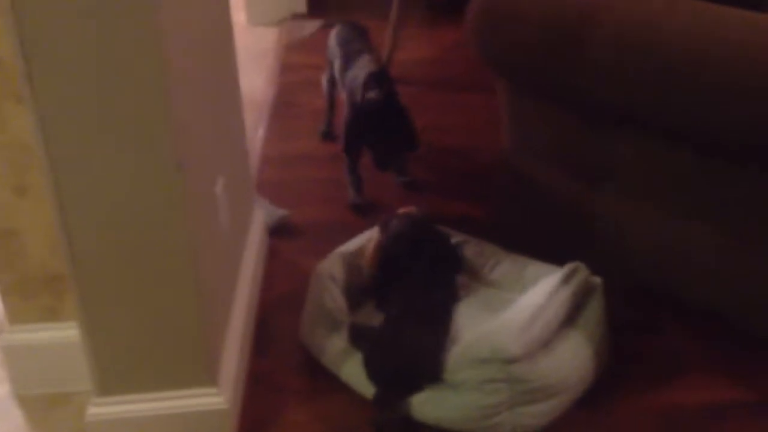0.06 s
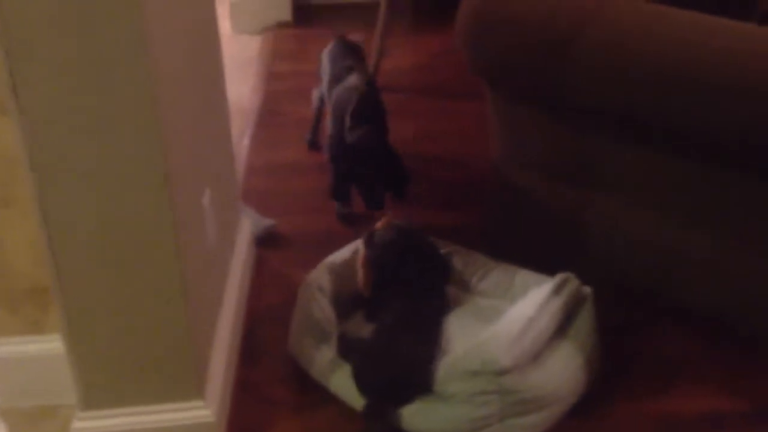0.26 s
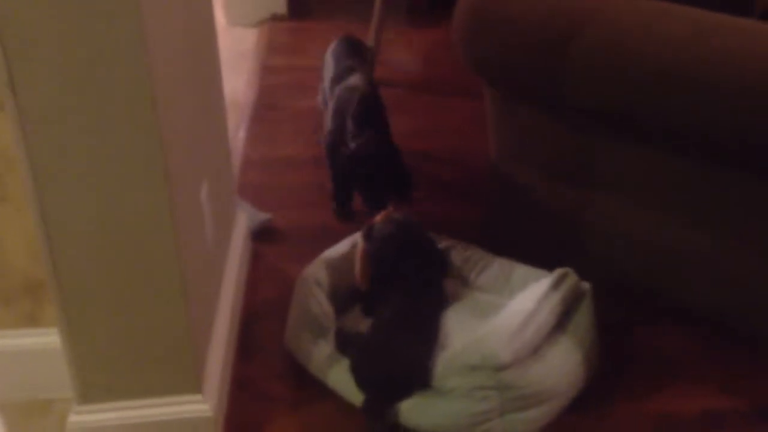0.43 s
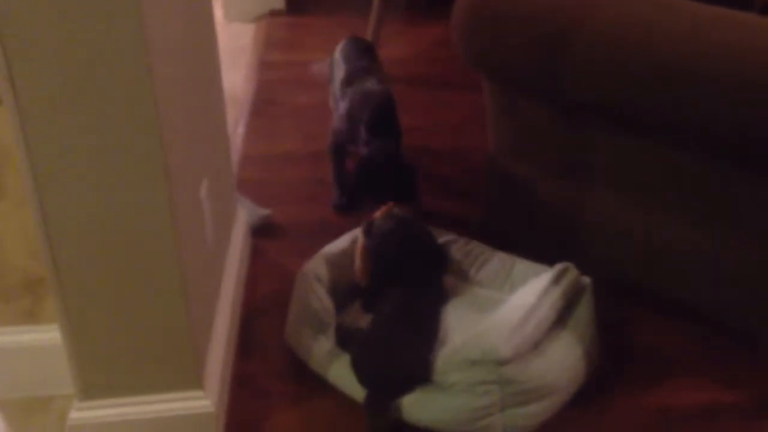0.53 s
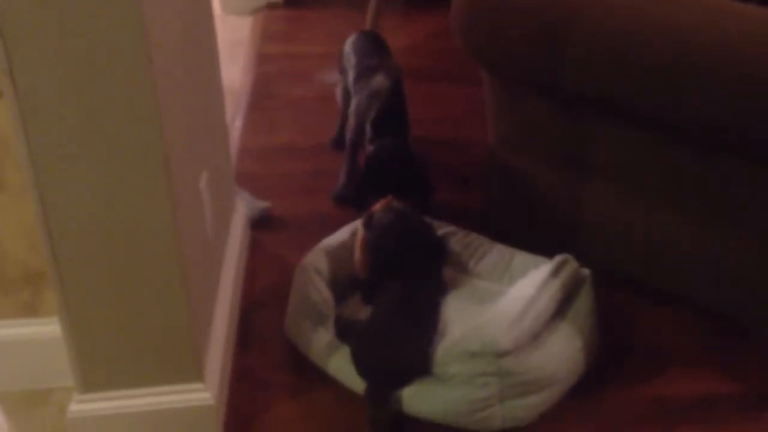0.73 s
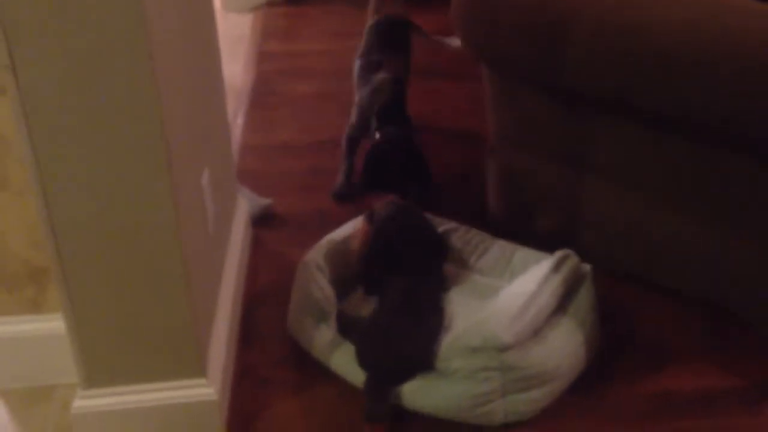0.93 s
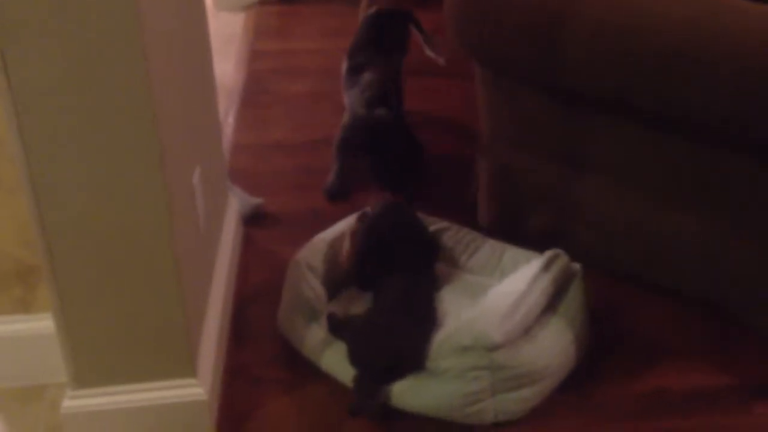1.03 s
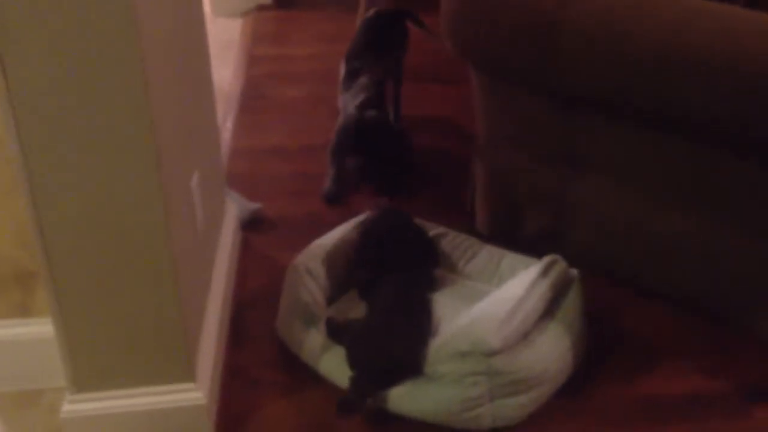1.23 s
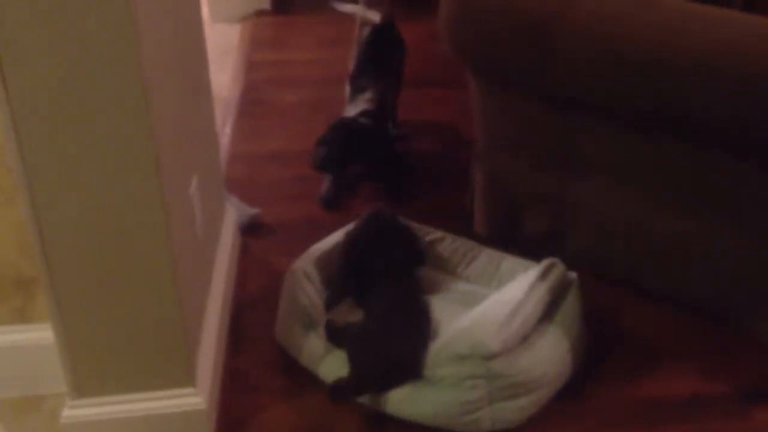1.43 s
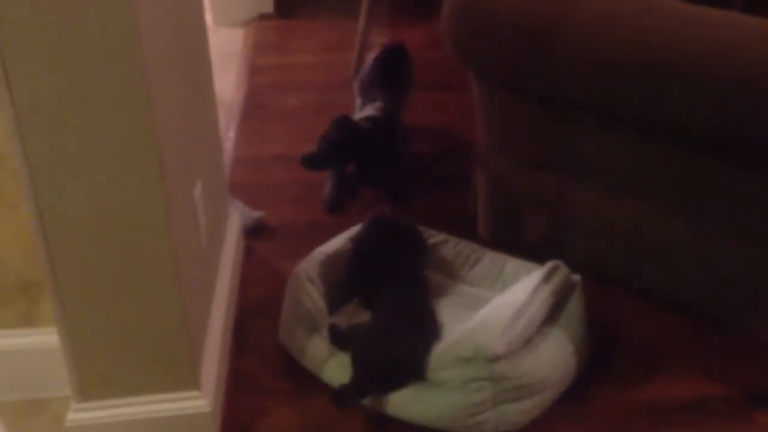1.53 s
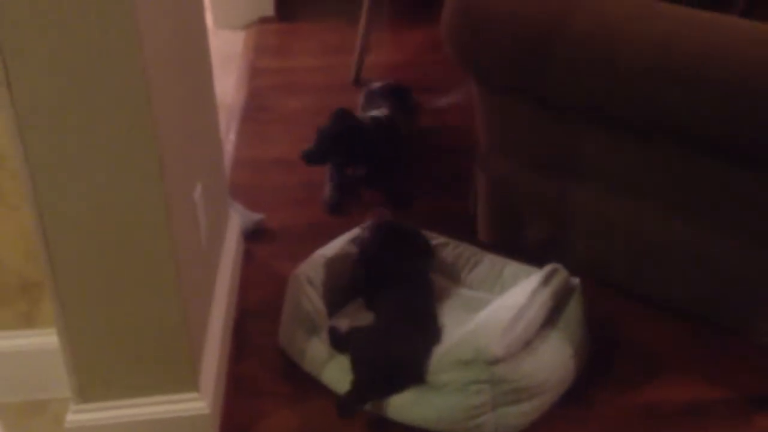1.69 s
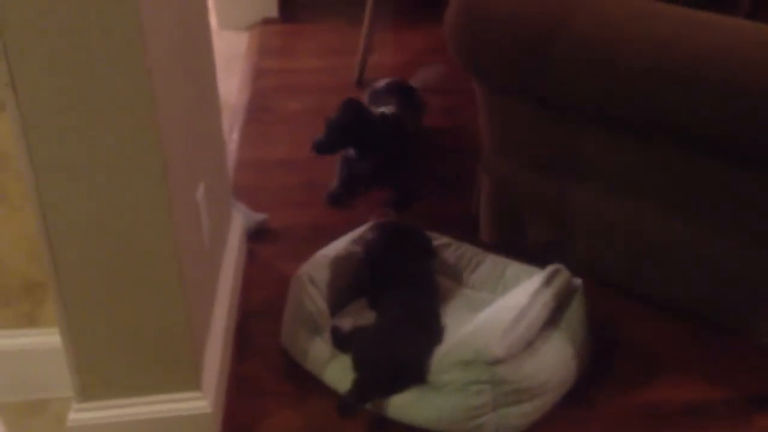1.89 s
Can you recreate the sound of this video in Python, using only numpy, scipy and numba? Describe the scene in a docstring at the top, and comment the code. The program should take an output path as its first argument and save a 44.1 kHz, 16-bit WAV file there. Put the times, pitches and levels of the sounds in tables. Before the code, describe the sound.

One long, low, rough dog growl starts after a floor knock, flutters, steadies and sinks in pitch, while collar tags clink and paws scuff on a wooden floor; quiet living room, single microphone with soft hiss.

```python
"""Young dog growling on a tug toy, quiet living room

One long, low growl through clamped teeth starts as a flutter, steadies, then sinks in pitch: uneven fold
pulses and rasp ring chest, throat, lips and teeth around clean low harmonics. Collar tags clink as decaying
metal modes; paws knock, click and scuff on the wooden floor as coloured bursts, impulses and noise swells.
Room noise, hiss and faint wandering tones lie underneath, with tiny treble crackles early on; one microphone."""
import sys
import numpy as np
from scipy import signal
from scipy.fft import rfft, irfft
from scipy.io import wavfile
from scipy.ndimage import uniform_filter1d
from numba import njit

SR = 44100
rng = np.random.default_rng(int(sys.argv[2]) if len(sys.argv) > 2 else 0)


def generate_wav(signal):
    """Clip the signal to [-1, 1] and save it as 16-bit WAV at the path in sys.argv[1]."""
    frames = np.transpose(np.atleast_2d(signal))
    scaled = np.clip(frames, -1, 1) * 32767
    pcm = np.round(scaled).astype(np.int16)
    wavfile.write(sys.argv[1], SR, pcm)


N = 85995

# Rough part of the growl, before trims and catches:
# t/s, chest level/dB, throat level/dB, lips level/dB, level of the snarl through bared teeth/dB
EFFORT = [(.42, -86, -64, -96, -91), (.45, -56, -66, -72, -87), (.49, -56.5, -60.5, -64, -72),
          (.56, -46.5, -65, -67.5, -76), (.62, -51.5, -59.5, -67, -69), (.71, -53.5, -65, -64.5, -73),
          (.76, -56.5, -58, -59.5, -62), (.84, -58.5, -58, -64, -63), (.915, -48.5, -59, -62.5, -70),
          (.96, -50, -59, -69, -79), (1.07, -49.5, -57.5, -62.5, -99), (1.13, -50.5, -58, -62, -73),
          (1.27, -56, -59.5, -61, -71), (1.41, -53.5, -61, -64.5, -61.5), (1.5, -59, -63, -67, -68.5),
          (1.61, -58.5, -66.5, -67, -87), (1.66, -58, -73.5, -92, -70.5), (1.72, -93, -64, -87, -70)]
# Grainy swells, the first a faint rasp of the growl, the others paws scuffing:
# middle t/s, length/s, level before the room/dB
GRAINY_SWELLS = [(0.837, 0.22, -75), (1.325, 0.089, -63.5), (1.42, 0.055, -66), (1.456, 0.012, -60),
                 (1.56, 0.041, -57.5), (1.625, 0.043, -65.5), (1.668, 0.027, -65.5)]
# Colour of the grainy swells: f/Hz, relative level/dB
GRAINY_COLOUR = [(100, -36), (1000, -4), (2700, -8.5), (3400, 3), (4700, -1), (5400, -12), (8000, -8.5),
                 (12000, -19), (15000, -14.5)]
CONTACT_ROOM_DB = -11  # room tail of claws and grainy swells


def undb(db):
    """Decibels to gain."""
    return 10 ** (np.asarray(db) / 20)


def unit(x):
    """Scale to rms 1."""
    return x / np.sqrt(np.mean(x ** 2) + 1e-30)


def clock():
    """Time of every sample in seconds."""
    return np.arange(N) / SR


def curve(table, axis):
    """One column of a table, joined by straight lines in time."""
    rows = np.array(table)
    return np.interp(clock(), rows[:, 0], rows[:, axis])


def walk(hz):
    """Smoothed random steps, hz per second, at rms 1."""
    k = int(SR / hz)
    steps = np.repeat(rng.standard_normal(N // k + 1), k)
    smooth = uniform_filter1d(uniform_filter1d(steps, k), k)
    return unit(smooth[:N])


def bumps(rows):
    """Brief rises or dips in dB at (t/s, half length/s, level/dB)."""
    return sum(db * np.exp(-((clock() - start) / length) ** 2) for start, length, db in rows)


def fade(start, t60):
    """Sudden start and exponential decay by 60 dB in t60 seconds."""
    age = clock() - start
    return (age >= 0) * undb(-60 * np.maximum(age, 0) / t60)


def colour(x, points):
    """Causal filter through (f/Hz, level/dB) points that keeps the power of white noise."""
    hz, db = np.array(points).T
    grid_hz = np.arange(N + 1) * SR / (2 * N)
    log_gain = np.interp(np.log(grid_hz + 1), np.log(hz), np.log(undb(db)))
    # Folding the cepstrum onto positive time makes the filter minimum phase
    cepstrum = irfft(log_gain)
    cepstrum[1:N] *= 2
    cepstrum[N + 1:] = 0
    filtered = irfft(rfft(x, 2 * N) * np.exp(rfft(cepstrum)))[:N]
    return filtered / np.sqrt(np.mean(np.exp(2 * log_gain)))


def resonate(x, table):
    """Resonances side by side, each filter run twice for steep skirts, with their sum at rms 1."""
    out = 0
    for hz, width, db in table:
        b, a = signal.iirpeak(hz, hz / width, fs=SR)
        once = signal.lfilter(b, a, x)
        out = out + undb(db) * unit(signal.lfilter(b, a, once))
    return unit(out)


def room(x, db):
    """Direct sound plus a short diffuse tail, its energy set in dB."""
    tail = colour(rng.standard_normal(N), [(200, -5), (2000, -5.0), (12000, -11.5)])
    tail = tail * fade(0.00262, t60=0.4)
    tail = tail / np.sqrt(np.sum(tail ** 2))
    return x + undb(db) * signal.fftconvolve(x, tail)[:N]


def taps(rows, points):
    """Single sharp contacts at (t/s, peak level/dB), coloured by what is struck."""
    ring = colour(signal.unit_impulse(N), points)
    times, db = np.array(rows).T
    pushes = np.bincount((times * SR).astype(int), undb(db), N)[:N]
    return signal.fftconvolve(pushes, ring / np.abs(ring).max())[:N]


def blows(rows, points, t60):
    """Short decaying noise bursts at (t/s, level/dB), coloured by what is struck."""
    envelope = sum(undb(db) * fade(start, t60) for start, db in rows)
    return colour(rng.standard_normal(N) * envelope, points)


def rubs(rows, points):
    """Grainy noise swells centred at (t/s, length/s, level/dB)."""
    swell = sum(undb(db) * np.exp(-(2 * (clock() - middle) / length) ** 2) for middle, length, db in rows)
    grain = unit(rng.standard_normal(N) * undb(2 * walk(700)))
    return colour(grain * swell, points)


def background():
    """Low room noise and hiss from shaped noise, with faint steady tones from sines that wander in level."""
    # Spectrum of room noise and hiss: f/Hz, relative level/dB
    air_colour = [(30, -33.5), (70, -26), (100, -27.5), (125, -12), (200, -6.5), (280, -1), (350, -6.5),
                  (450, -7), (600, -13.5), (800, -15), (1000, -16.5), (1400, -19), (2000, -22),
                  (3000, -27.5), (4200, -23), (5500, -29), (8000, -25.5), (10000, -33.5), (13000, -28),
                  (15000, -30.5)]
    # Faint steady tones, middle of the wander: f/Hz, level/dB
    tone_lines = [(120, -80.5), (184, -73.5), (1120, -83)]
    tones = 0
    for hz, db in tone_lines:
        tones = tones + np.sqrt(2) * undb(db + 2.2 * walk(4)) * np.sin(2 * np.pi * hz * clock())
    air_rms_db = -62.05
    return undb(air_rms_db) * unit(colour(rng.standard_normal(N), air_colour)) + tones


def crackle():
    """Tiny, unevenly spaced clicks high in the treble: coloured impulses of varying level."""
    # Short runs of crackle: start t/s, end t/s
    runs = [(.040, .046), (.061, .067), (.170, .236), (.251, .261)]
    # Colour of one click: f/Hz, relative level/dB
    click_colour = [(2000, -33), (7000, -23), (8200, 4.5), (9200, 3), (10500, -2), (13000, -4),
                    (15000, -6.5)]
    rate_hz, peak_db, timing_spread_s, level_spread_db = 189.6, -49, .001, 1.5
    times = np.concatenate([np.arange(start, end, 1 / rate_hz) for start, end in runs])
    chance = rng.standard_normal((len(times), 2))
    uneven_times = times + timing_spread_s * chance[:, 0]
    levels_db = peak_db + level_spread_db * chance[:, 1]
    return taps(np.c_[uneven_times, levels_db], click_colour)


def board_ring(start, force_db):
    """The struck floorboards ring as decaying sines, heard just after the blow."""
    # Modes of the boards: f/Hz, level against the blow/dB, t60/s
    board_modes = [(305, -18, 0.26), (1088, -23, 0.14), (1570, -19.5, 0.12), (2035, -22, .17)]
    ring = 0
    for hz, db, t60 in board_modes:
        tone = np.sin(2 * np.pi * hz * (clock() - start))
        ring = ring + undb(force_db + db) * fade(start + 0.0022, t60) * tone
    return ring


def paws():
    """Knocks are coloured impulses, thuds and claw clicks decaying noise, scuffs grainy noise on the boards."""
    # Knock on the floor, a blow and its bounce: t/s, peak level before the room/dB
    knock_rows = [(.2064, -42), (.2144, -45)]
    # Colour of the knock: f/Hz, relative level/dB
    knock_colour = [(30, -41), (100, -4), (400, 0), (750, 8), (1300, 5.5), (2000, 6), (2900, -14),
                    (5000, -37), (15000, -33)]
    # Dull thumps as the knock settles: t/s, peak level before the room/dB
    thump_rows = [(.2112, -52), (.2203, -59), (.23, -53), (.239, -56)]
    # Colour of the thumps: f/Hz, relative level/dB
    thump_colour = [(90, -42), (200, -14), (330, 0), (800, -20), (3000, -55)]
    # Paws landing: t/s, starting level/dB
    step_rows = [(.857, -55.5), (1.375, -54.5), (1.607, -62)]
    # Colour of the landing thuds: f/Hz, relative level/dB
    thud_colour = [(25, 2), (70, 2), (170, 12), (260, -24), (900, -36)]
    # Claw clicks: t/s, starting level before the room/dB
    claw_rows = [(1.609, -42.5), (1.618, -50.5), (1.771, -69)]
    # Colour of the claws: f/Hz, relative level/dB
    claw_colour = [(100, -28), (500, 1), (2000, 3.5), (2800, -4), (4200, 6), (5500, -4.5), (8000, -1),
                   (12000, -19), (15000, -29)]
    knock_room_db = -7.5
    contacts = taps(knock_rows, knock_colour) + taps(thump_rows, thump_colour)
    knocks = room(contacts, knock_room_db) + board_ring(*knock_rows[0])
    thuds = blows(step_rows, thud_colour, t60=0.025)
    clicks = blows(claw_rows, claw_colour, t60=0.0075)
    scuffs = rubs(GRAINY_SWELLS[1:], GRAINY_COLOUR)
    return knocks + thuds + room(clicks + scuffs, CONTACT_ROOM_DB)


def flap(x, table):
    """Loose tissue rings unevenly, but its swing is limited."""
    swing = signal.hilbert(resonate(x, table))
    swing_limit = .45  # against a ring at rms 1
    return unit(swing.real / np.hypot(np.abs(swing), swing_limit))


@njit
def sweep(x, hz, width):
    """State-variable band-pass whose centre moves."""
    out, band, low = np.empty(len(x)), 0., 0.
    for i in range(len(x)):
        g, k = np.tan(np.pi * hz[i] / SR), width / hz[i]
        v = (band + g * (x[i] - low)) / (1 + g * (g + k))
        band, low, out[i] = 2 * v - band, low + 2 * g * v, k * v
    return out


def sweep_twice(x, hz, width):
    """One steep, moving resonance at rms 1."""
    once = sweep(x, hz, float(width))
    return unit(sweep(once, hz, float(width)))


def fold_pulses(cycles):
    """One pulse per fold cycle, uneven in time and strength, as folds that close irregularly."""
    jitter_cycles, shimmer_db = 0.032, 3
    beat = np.arange(1, int(cycles[-1]))
    chance = rng.standard_normal((len(beat), 2))
    at = np.interp(beat + jitter_cycles * chance[:, 0], cycles, np.arange(N)).astype(int)
    return np.bincount(at, undb(shimmer_db * np.clip(chance[:, 1], -2, 2)), N)


def mouth(drive, grit, cycles):
    """Rough pulses and a clear buzz ring the moving throat and lips; grit rasps through the teeth."""
    # Fixed throat resonances: f/Hz, width of each pass/Hz, relative level/dB
    throat_rings = [(360, 90, -4), (482.5, 46, -1), (627.7, 68, 0), (703.3, 43, -3.5), (865, 130, -4.5)]
    # Resonances of the snarl at the teeth: f/Hz, width of each pass/Hz, relative level/dB
    teeth_rings = [(1517, 790, 6.5), (2226, 160, -3), (3450, 1700, -3.5)]
    # Resonances that move as the grip shifts: t/s, throat f/Hz, lips f/Hz
    mouth_shape = [(.5, 675, 1090), (.7, 670, 1190), (.82, 655, 1175), (.9, 630, 1250), (1.02, 660, 1119),
                   (1.14, 624, 1174), (1.3, 620, 1270), (1.42, 644, 1190), (1.65, 600, 1190)]
    # Gritty rasp between the teeth, before surges and room: t/s, level/dB
    grit_level = [(.45, -82), (.59, -70), (.66, -74), (.74, -74), (.99, -80), (1.07, -70), (1.22, -79.5),
                  (1.38, -72.5), (1.5, -96)]
    # Resonances of the grit: f/Hz, width of each pass/Hz, relative level/dB
    grit_rings = [(2240, 200, -1.5), (3500, 740, 4), (4510, 290, 0.5)]
    throat_width_hz, lips_width_hz = 180, 337  # each of two passes
    buzz_db, throat_buzz_db, buzz_flicker_db = -5.5, -.5, 2
    snarl_at_s, snarl_half_length_s, snarl_ratio = 1.3, .11, 1.25  # ratio to the lip resonance

    throat_hz, lip_hz = curve(mouth_shape, axis=1), curve(mouth_shape, axis=2)
    throat, lips, teeth = [undb(curve(EFFORT, axis)) for axis in (2, 3, 4)]
    rough = resonate(drive, throat_rings) * throat
    rough = rough + sweep_twice(drive, lip_hz, lips_width_hz) * lips
    rough = rough + resonate(drive, teeth_rings) * teeth

    buzz = unit(sum(np.cos(2 * np.pi * k * cycles) for k in range(3, 15)))  # harmonics 3 to 14
    clear = sweep_twice(buzz, throat_hz, throat_width_hz) * throat * undb(throat_buzz_db)
    clear = clear + sweep_twice(buzz, lip_hz, lips_width_hz) * lips
    # The teeth are bared once near the end and ring above the lips
    bared = np.exp(-((clock() - snarl_at_s) / snarl_half_length_s) ** 2)
    clear = clear + sweep_twice(buzz, snarl_ratio * lip_hz, lips_width_hz) * lips * bared
    rasp = resonate(grit, grit_rings) * undb(curve(grit_level, axis=1))
    return rough, undb(buzz_db + buzz_flicker_db * walk(90)) * clear + rasp


def growl():
    """Uneven fold pulses and gated rasp ring chest and mouth, around clean low harmonics that stumble and split."""
    # Vocal folds: t/s, pitch f/Hz, level of the clean second harmonic before tremor and catches/dB
    folds = [(.44, 108.2, -54), (.49, 110.9, -58.5), (.55, 111.6, -52), (.64, 111.9, -56),
             (.70, 110.3, -52), (.78, 113.9, -46), (.86, 119, -53), (.94, 123.7, -50.5), (1.05, 125.7, -48),
             (1.12, 120.1, -63.5), (1.2, 124.3, -47), (1.31, 118.6, -50.5), (1.38, 105.8, -43),
             (1.45, 102, -49.5), (1.48, 98.83, -62), (1.515, 100.4, -46), (1.55, 96, -55.5),
             (1.605, 95.5, -51), (1.68, 85.6, -65)]
    # Catches where the voice dips for an instant: t/s, half length/s, depth/dB
    catch_rows = [(.426, .015, -26), (.469, .007, -18), (.502, .004, -10), (.531, .006, -11),
                  (.572, .004, -10), (.637, .004, -9), (.679, .005, -5), (.911, .005, -8),
                  (.989, .005, -11), (1.127, .004, -9), (1.291, .004, -5), (1.36, .007, -10),
                  (1.397, .006, -14), (1.468, .005, -8), (1.497, .004, -8), (1.552, .008, -5),
                  (1.6, .003, -8)]
    # Hoarse surges in the mouth: t/s, rise/dB
    surge_rows = [(.832, 5), (.878, 4), (.914, 8), (1.035, 5), (1.137, 5), (1.257, 6), (1.366, 6)]
    # A second strand splits off as the growl sinks: t/s, f/Hz, level before catches/dB
    strand_path = [(1.3, 262, -93), (1.36, 254.3, -52), (1.45, 231.3, -49), (1.54, 242.4, -73.5),
                   (1.575, 284, -55.5), (1.62, 237, -52.5), (1.68, 200.8, -87)]
    # Chest resonances: f/Hz, width of each pass/Hz, relative level/dB
    chest_rings = [(162.7, 31, -3), (195.5, 31, -3.5), (228, 58.7, 0), (290.3, 9.7, -20.5)]
    # Deep chest resonances: f/Hz, width of each pass/Hz, relative level/dB
    deep_chest_rings = [(123.6, 9.2, 7.7), (142.5, 28, 0.29)]
    waver, tremor_db, fundamental_db = .016, 1, -12.5  # waver: share of pitch; fundamental: against second
    stumble_from_s, stumble_per_db = 1.33, .012  # share of pitch lost per dB of catch
    rasp_share, chest_pulse_share = 0.38, 0.29
    deep_db, deep_from_hz, deep_loss_db_per_hz = -2.5, 118.6, 0.5
    surge_half_length_s, mouth_catch_share = .0065, .35
    rough_db, rough_room_db, edge_room_db, low_cut_hz = -6, 1, -3.5, 114

    t = clock()
    pitch, catches = curve(folds, axis=1), bumps(catch_rows)
    stumble = stumble_per_db * catches * (t > stumble_from_s)
    cycles = np.cumsum(pitch * (1 + waver * walk(45) + stumble)) / SR
    pulses = fold_pulses(cycles)
    # Each pulse lets out a decaying puff of noise
    puffs = unit(signal.fftconvolve(pulses, fade(0, t60=0.012))[:N] * rng.standard_normal(N))
    drive = unit(pulses) + rasp_share * puffs
    heave = chest_pulse_share * unit(pulses) + puffs

    # The deep chest weakens as the pitch sinks
    deep = undb(deep_db - deep_loss_db_per_hz * np.maximum(deep_from_hz - pitch, 0))
    rumble = flap(heave, chest_rings) + deep * flap(heave, deep_chest_rings)
    rumble = rumble * undb(curve(EFFORT, axis=1))

    clean = np.sin(4 * np.pi * cycles) + undb(fundamental_db) * np.sin(2 * np.pi * cycles)
    clean = clean * undb(curve(folds, axis=2) + tremor_db * walk(70))
    strand_cycles = np.cumsum(curve(strand_path, axis=1)) / SR
    strand = np.sin(2 * np.pi * strand_cycles) * undb(curve(strand_path, axis=2))

    gate = np.interp(t, [.41, .44, 1.68, 1.76], [0, 1, 1, 0])
    surges = bumps([(start, surge_half_length_s, db) for start, db in surge_rows])
    push = gate * undb(mouth_catch_share * catches + surges)
    rough, edge = mouth(drive, puffs, cycles)
    voice = (rumble + np.sqrt(2) * (clean + strand)) * gate * undb(catches)
    voice = voice + undb(rough_db) * room(rough * push, rough_room_db)
    voice = voice + room(edge * push, edge_room_db)
    low_cut = signal.butter(10, low_cut_hz, "high", fs=SR, output="sos")
    return signal.sosfiltfilt(low_cut, voice)


def tags():
    """Two small metal tags ring as decaying modes, brighter when struck harder; the ring ticks and shakes."""
    # Tag clinks: t/s, level before mode and chance/dB, share of the smaller tag (0-1)
    clinks = [(.584, -52, .95), (0.596, -67, 0.8), (0.736, -64, 0.37), (.835, -62, 0.3), (.858, -54, 0.5),
              (0.938, -53.5, 0.4), (1.027, -59.5, 0), (1.063, -54, 0), (1.127, -55, 0.9),
              (1.167, -51.5, 0.9), (1.216, -58.5, .2), (1.322, -49, 0.54), (1.341, -51, 0.9),
              (1.373, -48.5, 0.36), (1.415, -42.5, 0.3), (1.469, -60, 0), (1.666, -64, 0.6),
              (1.75, -65, 0.12)]
    # Modes of the bigger tag: f/Hz, relative level/dB, t60/s
    big_tag = [(7250, -6, 0.031), (7314, -1, 0.048), (9600, -18, 0.12), (12900, -21, 0.052)]
    # Modes of the smaller tag: f/Hz, relative level/dB, t60/s
    small_tag = [(7430, -4.5, 0.02), (8030, -4.5, 0.055), (9300, -24, 0.044), (11800, -10, 0.054),
                 (13300, -15, 0.064)]
    # Sharp ticks of the collar ring: t/s, starting level before the room/dB
    tick_rows = [(.859, -61), (1.128, -65), (1.289, -67), (1.323, -64), (1.3735, -52)]
    # Colour of the ticks: f/Hz, relative level/dB
    tick_colour = [(3000, -31), (7000, 12), (10000, 25), (14000, 7), (16000, -7)]
    # The collar shakes between clinks: middle t/s, length/s, level before the room/dB
    shake_rows = [(.757, .03, -78), (.86, 0.32, -70), (1.165, 0.14, -68.5), (1.345, 0.12, -67),
                  (1.40, 0.068, -77)]
    # Colour of the shaking: f/Hz, relative level/dB
    shake_colour = [(3000, -40), (6500, 2), (7900, 11.5), (8400, -6), (8900, 7), (9400, -19), (9950, 6.5),
                    (11000, -7), (12300, 6.5), (13500, -8), (15000, -18)]
    attack_s, detune_spread = .0012, .003
    brighten = 0.7  # dB more in the modes above 8500 Hz per dB of force

    out, hardest = np.zeros(N), max(db for _, db, _ in clinks)
    for start, db, share in clinks:
        age = clock() - start
        attack = np.clip(age / attack_s, 0, 1)
        for modes, weight in ((big_tag, 1 - share), (small_tag, share)):
            for hz, mode_db, t60 in modes:
                detune, strength_db = rng.standard_normal(2)
                dull_db = brighten * (db - hardest) * (hz > 8500)
                tone = np.sin(2 * np.pi * hz * (1 + detune_spread * detune) * age)
                gain = weight * undb(db + mode_db + dull_db + strength_db)
                out += gain * fade(start, t60) * tone * attack
    return out + blows(tick_rows, tick_colour, t60=0.038) + rubs(shake_rows, shake_colour)


def growl_rasp():
    """Faint grainy rasp of the growl: one long swell of coloured noise with a short room tail."""
    return room(rubs(GRAINY_SWELLS[:1], GRAINY_COLOUR), CONTACT_ROOM_DB)


def scene():
    """Everything summed at one microphone, the tags with their own room tail."""
    tag_room_db = -9
    tagged = room(tags(), tag_room_db)
    return (background() + crackle() + paws() + growl() + tagged + growl_rasp())[None]


def record(dry):
    """The recorder cuts the top with a steep low-pass."""
    top_hz = 15450
    low_pass = signal.ellip(10, .2, 60, top_hz, fs=SR, output="sos")  # .2 dB ripple, 60 dB stop
    return signal.sosfilt(low_pass, dry)


dry = scene()
out = record(dry)
generate_wav(out)
```